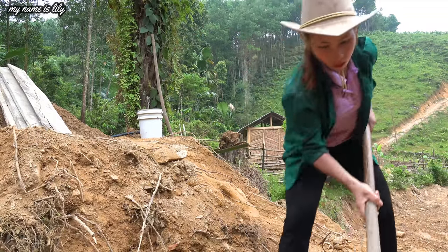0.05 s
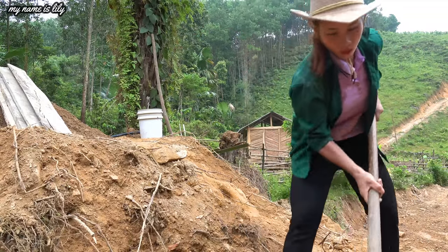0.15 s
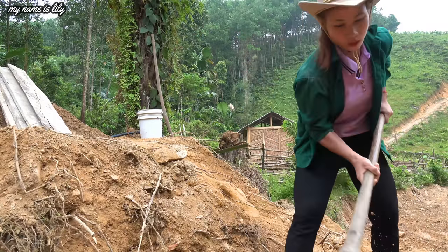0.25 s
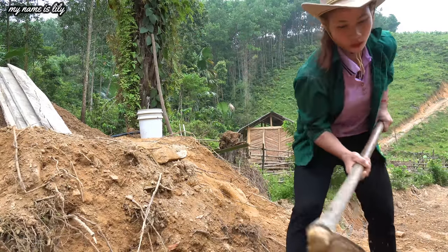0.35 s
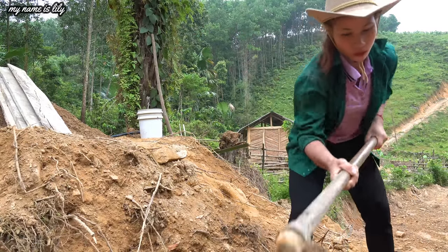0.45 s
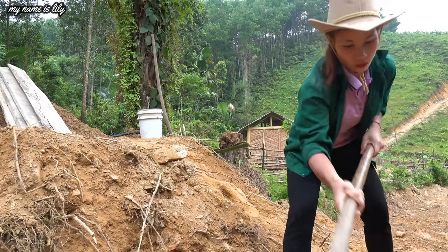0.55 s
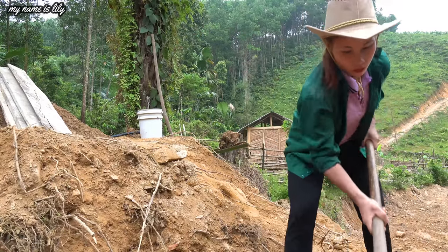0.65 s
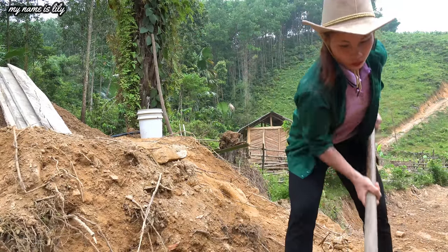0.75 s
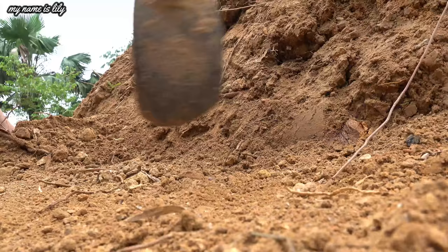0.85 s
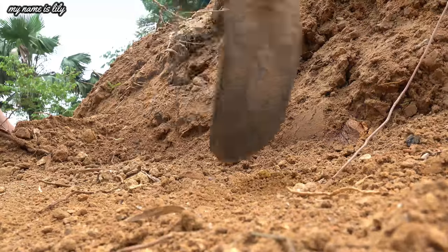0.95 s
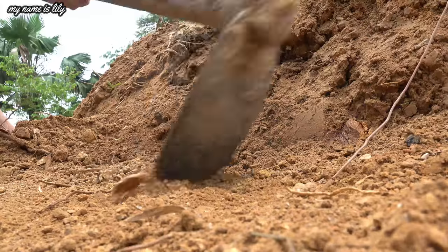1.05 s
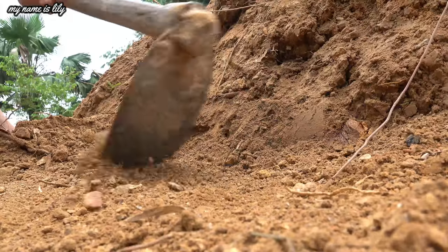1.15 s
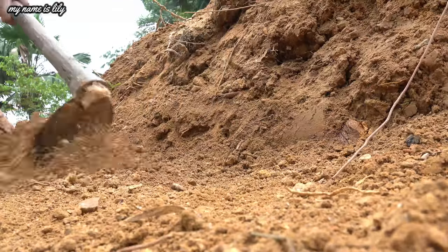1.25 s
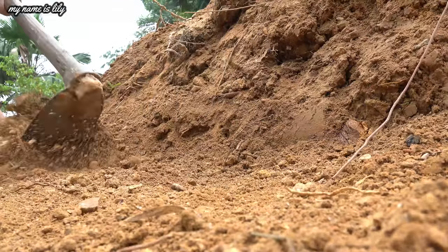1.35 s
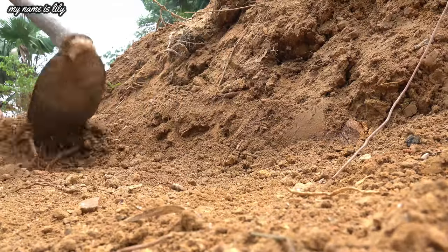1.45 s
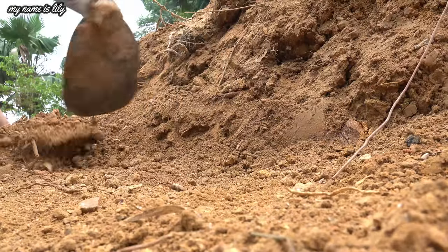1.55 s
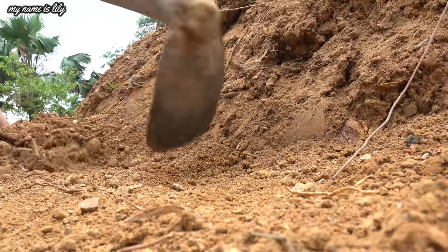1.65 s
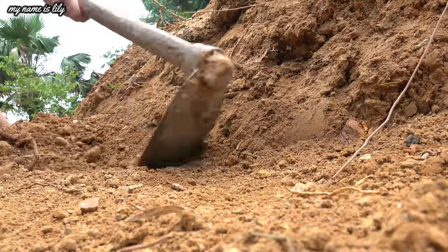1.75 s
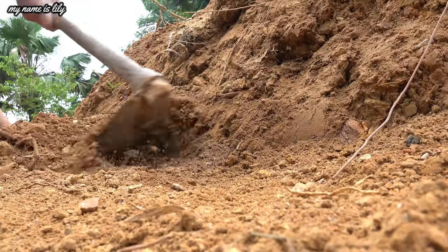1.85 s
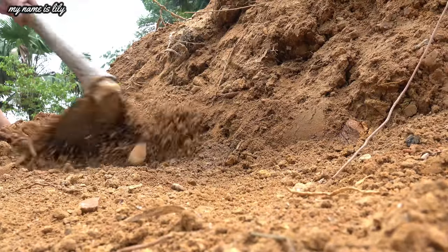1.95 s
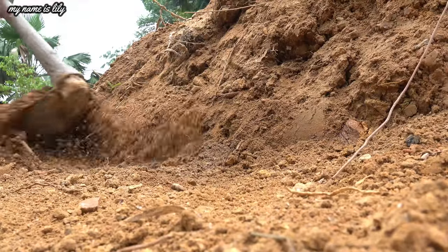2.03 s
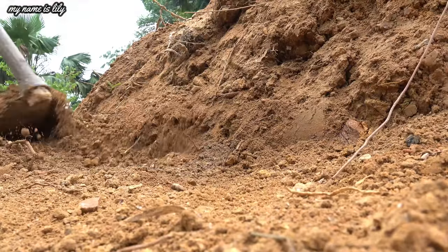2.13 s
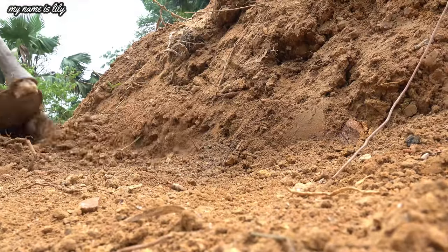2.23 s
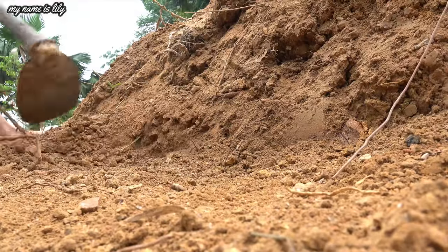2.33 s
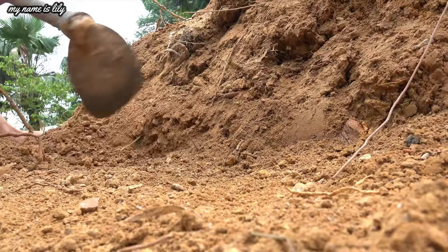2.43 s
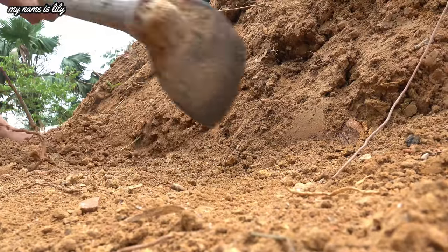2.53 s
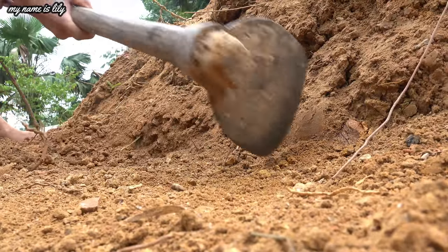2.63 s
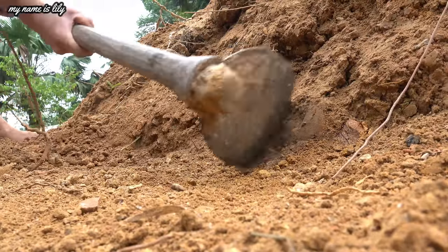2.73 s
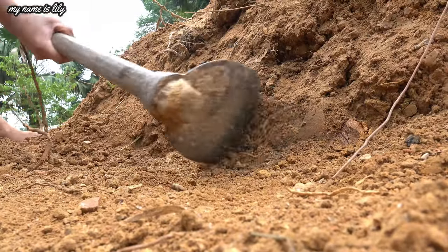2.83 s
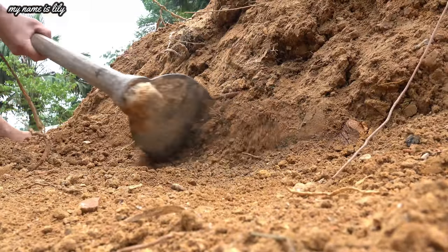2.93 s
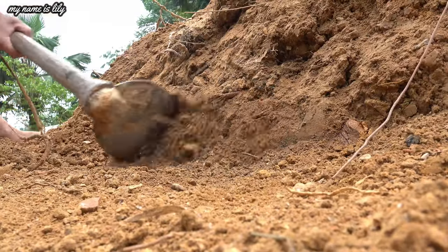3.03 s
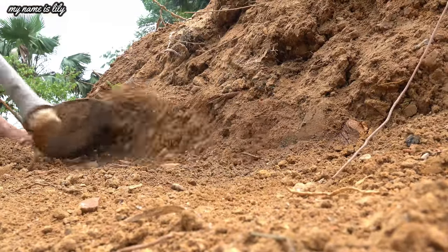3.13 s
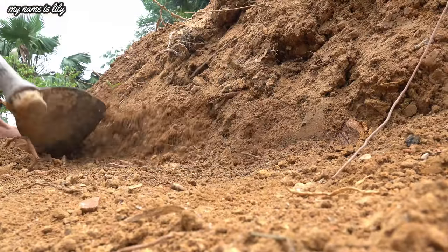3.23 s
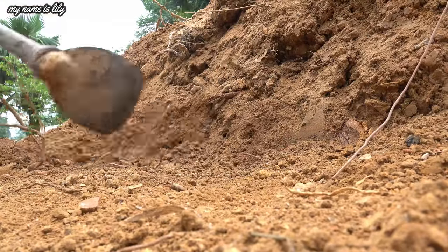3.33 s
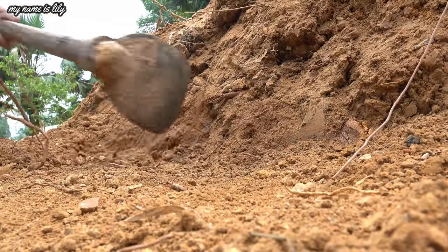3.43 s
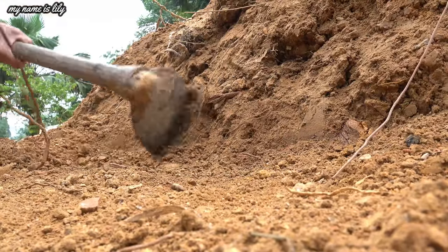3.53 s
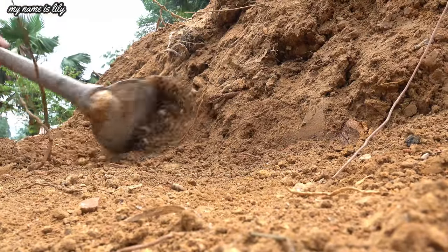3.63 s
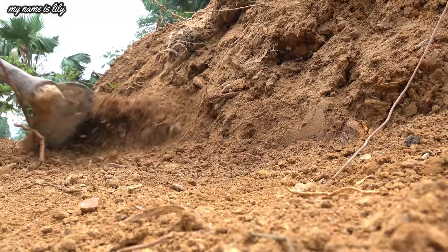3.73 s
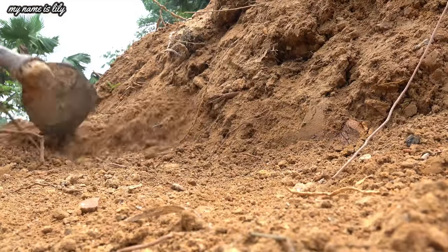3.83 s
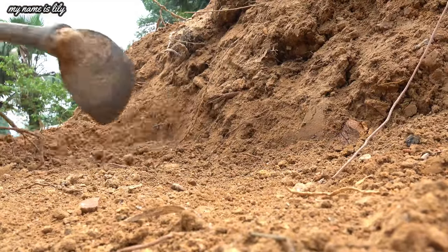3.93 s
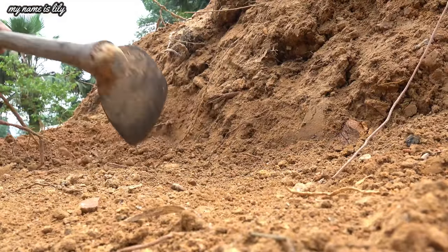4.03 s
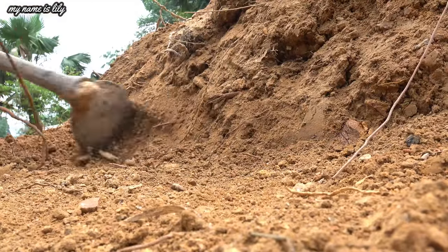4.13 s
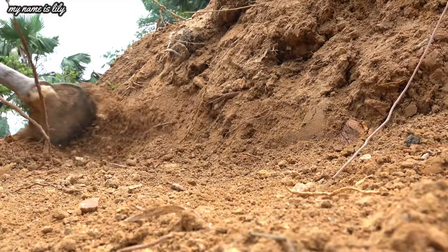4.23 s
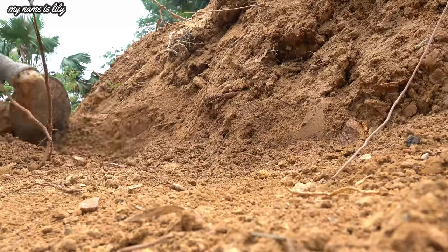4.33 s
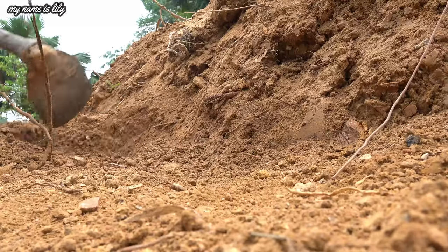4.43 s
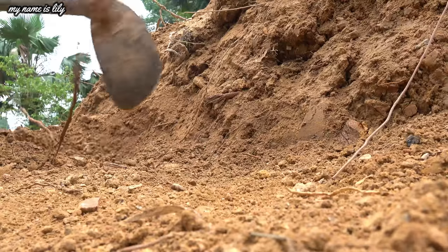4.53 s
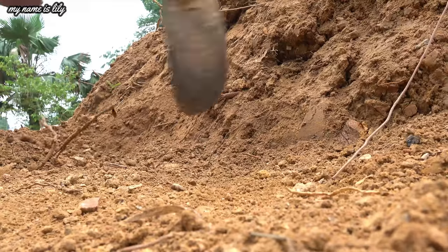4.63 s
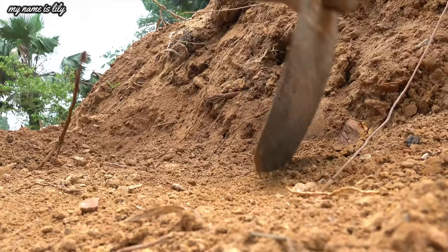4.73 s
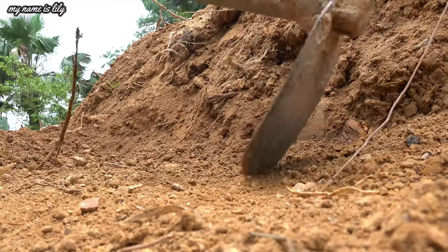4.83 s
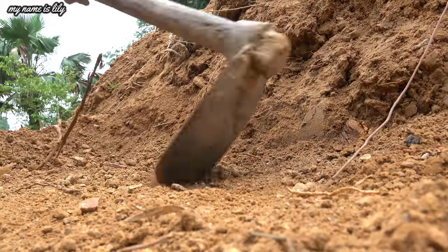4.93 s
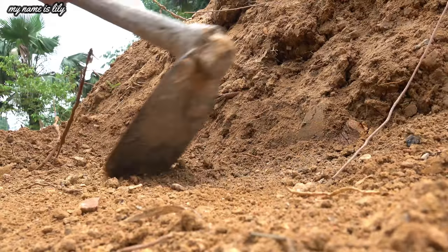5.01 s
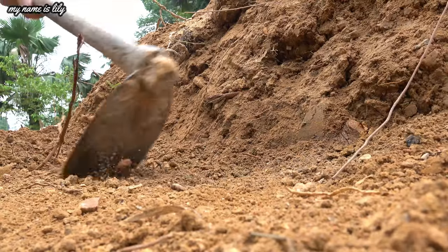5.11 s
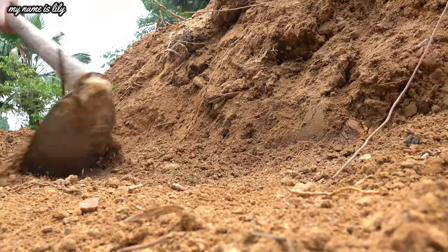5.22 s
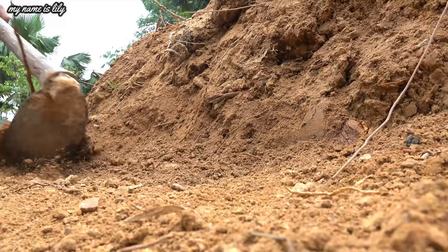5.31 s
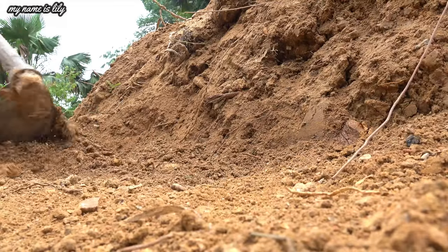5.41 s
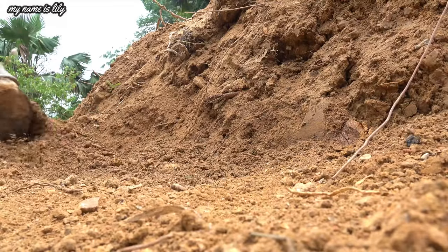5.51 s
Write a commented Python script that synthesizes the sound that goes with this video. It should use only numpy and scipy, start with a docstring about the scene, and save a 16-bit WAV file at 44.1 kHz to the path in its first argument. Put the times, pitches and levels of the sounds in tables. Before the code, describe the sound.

Outdoors, close to the ground: a sharp hoe chop opens, then short and long scraping pulls follow at irregular gaps. The blade rasps and rings brightly against pebbles, while packed earth thumps low and the wooden handle knocks. Each pull slides leftwards and fades; the last is long and strong. Light hiss lies beneath, with very little echo.

```python
"""A steady outdoor hiss is present from the start; after some 0.9 s it drops, and it swells again at the end.
From the first moment a steel hoe on a wooden handle chops stony soil: nine strokes on an open hillside.
In each, filtered bursts of cracking grains strike blade modes, over sliding soil made of shaped grain noise.
Decaying sines ring where steel hits stone squarely; resonant noise makes the ground thud and the handle knock.
As each pull goes on it moves from right to left and sags; then the soil stops and a short trickle follows."""
import sys
import numpy as np
from scipy.fft import rfft, irfft, next_fast_len
from scipy.io import wavfile
from scipy.ndimage import uniform_filter1d

SR = 44100
rng = np.random.default_rng(int(sys.argv[2]) if len(sys.argv) > 2 else 0)


def wav_out(sig):
    """Save sig, one row per channel (or a flat mono array), as 16-bit PCM at SR to the path in sys.argv[1]."""
    wavfile.write(sys.argv[1], SR, np.round(np.clip(np.atleast_2d(sig).T, -1, 1) * 32767).astype(np.int16))


N = 245624
BLOW_SIZE = 16384   # samples computed for one contact
FULL_SIZE = next_fast_len(N + BLOW_SIZE)
TIME, BLOW_TIME = np.arange(N) / SR, np.arange(BLOW_SIZE) / SR
HZ, BLOW_HZ = np.fft.rfftfreq(FULL_SIZE, 1 / SR), np.fft.rfftfreq(BLOW_SIZE, 1 / SR)
LEFT_RIGHT = np.array([[1], [-1]])

# the blade bites hard on grit or a stone:
# (time [s], contact time scale [s], level [dB], weight as low-mid colour [dB], loudest pitch [Hz])
GRIT_BITES = [(0.017, 0.0089, -15.5, 0.5, 3570), (0.021, 0.021, -15.5, 2.5, 3660),
              (0.046, 0.018, -18, 3, 4300), (0.0734, 0.027, -17.3, 5.5, 3930), (0.102, 0.017, -21, 7, 2380),
              (0.1227, 0.038, -28.5, 3, 4240), (0.163, 0.025, -28.5, 7, 1790),
              (0.688, 0.0085, -18, -6, 5900), (0.699, 0.034, -19, 4.5, 4230),
              (0.7505, 0.01, -21.5, 10, 2040), (1.055, 0.029, -20.5, -1, 8120), (1.108, 0.02, -29, 7, 8100),
              (1.132, .034, -20, -0.5, 4300), (1.1589, 0.022, -17, 6, 4400), (1.219, 0.041, -24, -6, 4900),
              (1.29, .031, -18, -3, 4300), (1.326, 0.0042, -15.5, 1, 4340), (1.334, 0.0017, -10, -11, 4460),
              (1.381, .025, -32, -2.5, 4650), (1.477, 0.027, -42, 1, 4460), (1.769, .006, -32, 10, 3640),
              (1.7772, 0.045, -21, -2, 7600), (1.851, 0.028, -20, -4, 7550), (1.879, 0.05, -21, -2, 8000),
              (1.9162, 0.01, -18.5, 5.5, 4420), (1.9417, 0.0064, -16.5, -6, 4440),
              (1.979, 0.0082, -22, -4, 5530), (2.011, 0.0051, -23.5, 2, 5840),
              (2.055, 0.011, -17.5, 2.5, 8060), (2.092, .012, -24.5, -34, 5700),
              (2.147, 0.021, -30.5, 1.5, 824), (2.2586, 0.02, -31, -10, 4300),
              (2.7192, 0.025, -19.5, 0.5, 7460), (2.754, 0.0085, -24.5, -0.5, 5000),
              (2.828, .004, -16.5, -3, 6700), (2.835, .033, -18, 4, 4800), (2.891, 0.0048, -22.5, -8, 4800),
              (2.9205, 0.025, -20, 4.5, 8300), (2.977, 0.029, -21.5, 0, 4700),
              (3.0115, 0.009, -18, 12.5, 2160), (3.028, .016, -22.5, 13, 8300),
              (3.056, 0.022, -22.5, 1.5, 4870), (3.084, 0.017, -21.5, -1.5, 8600),
              (3.109, 0.03, -22, 6, 8120), (3.2095, 0.045, -33, -5, 4530), (3.303, 0.01, -30, 1.5, 4460),
              (3.575, 0.0056, -21.5, -10, 8100), (3.576, .045, -24, -4.5, 8000),
              (3.5866, .033, -23, -13, 5000), (3.6266, 0.0053, -18.3, -22, 5370),
              (3.642, 0.0075, -18.5, 4, 5240), (3.66, 0.019, -18, 8, 870), (3.7024, 0.013, -19.5, -4, 8250),
              (3.7528, 0.02, -21, 1, 8800), (3.797, 0.017, -34, 5, 4680), (3.8175, 0.011, -24.5, -3, 4530),
              (3.841, 0.007, -31.5, -17, 4400), (4.1343, 0.014, -23.5, -1.5, 4400),
              (4.1467, 0.038, -20.5, -2.5, 8630), (4.193, 0.0023, -25, 7, 5650),
              (4.22, .0044, -21, -8, 5630), (4.2486, 0.01, -18, 0, 4120), (4.316, 0.034, -30.5, 2.5, 4600),
              (4.5387, 0.017, -35, -20, 4360), (4.827, 0.017, -21, -0.5, 7150),
              (4.951, 0.012, -20, -19, 4450), (4.978, 0.03, -22, -7, 8150), (5.008, 0.017, -15.5, 6, 8100),
              (5.0923, 0.025, -19, 1.5, 4600), (5.127, .013, -18, -9, 4600),
              (5.152, 0.014, -18.5, -14, 4570), (5.1732, 0.022, -17.5, 4, 4550),
              (5.2115, .022, -17.5, 2.5, 4400), (5.249, 0.013, -15.5, 4, 4000),
              (5.3062, 0.034, -15.5, 3.5, 3900), (5.3537, 0.058, -25.5, 3.5, 4100),
              (5.389, 0.0066, -16.5, -4.5, 4080), (5.45, 0.046, -27, 3, 4110),
              (5.502, .008, -27.5, -13, 4100)]
# blade modes: (frequency [Hz], width [Hz], relative level dragged flat [dB], relative level held by the edge [dB])
BLADE_MODES = [(797, 36, 8.5, 5), (1205, 140, -23.5, 6.5), (1800, 11, -5, -34), (2230, 43, -17, 2),
               (2360, 52, 1, 1.5), (3006, 105, -33, 11.5), (3432, 89, -20, 13.5), (3572, 77, 8, -18),
               (3950, 61, -2, 2), (4400, 89, -2, 4), (4460, 41, -12, -16), (4875, 36, 4, -29),
               (5180, 27, -13, -6), (5545, 140, 2.5, -21), (5970, 31, 3, 0), (6750, 80, 2.5, -52),
               (7172, 25, 1, 2.5), (7450, 19, -1, -5), (8120, 40, 7, 1), (8270, 43, 8, -8),
               (8750, 130, -3.5, -38), (9500, 150, -9, 5.5)]
# colour of crushed grit: (frequency [Hz], relative level [dB])
CRUSHED_GRIT = [(100, -21.5), (350, -13.5), (750, -7), (1400, -5), (2200, -1), (2950, -10), (3600, -2),
                (4400, 3.5), (6200, 1), (8300, 0.5), (10000, -9.5), (12000, -14), (16000, -19)]
TREBLE_SAG_DB_PER_S = 4   # bites get duller as the blade slows during a pull
# a bite with a higher loudest pitch is brighter
BRIGHT_DB_PER_OCTAVE, USUAL_PITCH_HZ = 0.5, 5000


def bites(pitch_db=3, pitch_width_hz=300, scatter_db=4, ring_db=-1, slip_db=2.5):
    """Stick-slip excitation: slipping grit drives a resonance at the bite's loudest pitch and a new mode mix."""
    out = np.zeros(N)
    modes = resonances(BLADE_MODES, BLOW_HZ)
    flat_db, edge_db = np.array(BLADE_MODES).T[2:]
    grit = colour(CRUSHED_GRIT, BLOW_HZ)
    for s, length, db, low_db, pitch_hz in GRIT_BITES + pebbles():
        pulled, free_db, edge, treble_db = stroke_at(s)
        treble_db = treble_db - TREBLE_SAG_DB_PER_S * pulled
        treble_db = treble_db + BRIGHT_DB_PER_OCTAVE * np.log2(pitch_hz / USUAL_PITCH_HZ)
        held_db = flat_db + edge * (edge_db - flat_db)
        mode_db = held_db + scatter_db * rng.standard_normal(len(BLADE_MODES))
        steel = (from_db(ring_db + free_db + mode_db)[:, None] * modes).sum(0)
        loudest = from_db(pitch_db) * resonances([(pitch_hz, pitch_width_hz)], BLOW_HZ)[0]
        tilt = colour([(2000, low_db), (3700, 0), (5500, 0), (7800, treble_db)], BLOW_HZ)
        tone = causal(grit * tilt)
        texture = grains(BLOW_SIZE, per_s=3200, spread_db=3.0, dust_db=-5.5)
        slips = from_db(slip_db * drift(320, BLOW_TIME))
        add(out, s, blow(pressure(length), texture * slips, tone * (1 + loudest + steel), db))
    return out


# small pebbles catch at random during a pull; their level is counted from the fine grit
PEBBLES_PER_S, PEBBLE_S, PEBBLE_DB, PEBBLE_SPREAD_DB, PEBBLE_WEIGHT_DB = 20, 0.0033, 7, 3.5, -14.5
PEBBLE_LOW_HZ, PEBBLE_HIGH_HZ = 4300, 5900


def pebbles():
    """Random impacts: light, short bites scattered over each pull after its build-up, in columns of GRIT_BITES."""
    rows = []
    for s, build_up, length, fine_db, *_ in HOE_STROKES:
        place, level, pitch = rng.random((3, 24))
        times = build_up + (np.arange(len(place)) + place) / PEBBLES_PER_S
        spread_db = PEBBLE_SPREAD_DB * (2 * level - 1)
        levels = fine_db + PEBBLE_DB + spread_db - PULL_SAG_DB_PER_S * times
        pitches = PEBBLE_LOW_HZ + pitch * (PEBBLE_HIGH_HZ - PEBBLE_LOW_HZ)
        for t, db, hz in zip(times, levels, pitches):
            if t < length:
                rows.append((s + t, PEBBLE_S, db, PEBBLE_WEIGHT_DB, hz))
    return rows


# the steel hits a stone squarely and rings on:
# (time [s], relative level [dB], ring time as a factor on T60 [1], favoured partial [Hz])
STONE_CLINKS = [(1.119, -16, 0.96, 8100), (1.176, -20, 0.43, 5090), (1.22, -18.5, 0.44, 4455),
                (1.237, -15.5, 1.16, 5090), (1.273, -14, 1.8, 8372), (1.495, -32, 1.8, 4455),
                (1.944, -21, 0.49, 4455), (2.266, -33.5, 3.8, 3562), (2.797, -28.5, 3.9, 797),
                (2.923, -14.5, 0.81, 3562), (2.962, -18, 0.78, 3562), (3.014, -17, 0.43, 2230),
                (3.027, -16, 2.6, 4455), (3.167, -24, 4.4, 8372), (3.305, -26, 1.8, 4455),
                (3.576, -28, 0.45, 8100), (3.819, -27.5, 1.3, 4875), (4.141, -16.5, 1.04, 797),
                (4.346, -22, 0.8, 4455), (4.536, -34, 2.3, 3562), (4.818, -22.5, 1.1, 7172),
                (4.945, -17, 1.3, 9580), (5.155, -21, 0.67, 4455), (5.231, -19, 0.79, 4130),
                (5.265, -15.5, 0.49, 4130), (5.394, -19, 0.66, 4130)]
# partials of the ringing blade: (frequency [Hz], relative level [dB], T60 before the clink's factor [s])
RING_PARTIALS = [(797, -11, 0.055), (1913, -12, 0.16), (2230, -8.5, 0.036), (3562, -2, 0.063),
                 (4130, -1, 0.018), (4455, -2, 0.057), (4875, -1, 0.048), (5090, -4, 0.089),
                 (5900, -6.5, 0.024), (7172, -5.5, 0.031), (8100, 1, 0.051), (8372, 3.5, 0.024),
                 (9580, -7, 0.096)]
# colour of the crack and of the fine grit in a drag: (frequency [Hz], relative level [dB])
FINE_GRIT = [(1500, -36), (2900, -30), (3600, -1), (4400, 8.5), (6200, 2), (8300, 4.5), (10000, -6.5),
             (12000, -8.5), (16000, -18)]


def clinks(level_db=3.5, scatter_db=3.0, favour_db=9, crack_db=-4, crack_t60=0.016):
    """Free modal decay: a hard contact cracks, then partials die away; the place struck favours one of them."""
    out = np.zeros(N)
    hz, mode_db, t60 = np.array(RING_PARTIALS).T[:, :, None]
    grit = causal(colour(FINE_GRIT, BLOW_HZ))
    for s, db, hold, favoured_hz in STONE_CLINKS:
        distance = abs(hz - favoured_hz)
        favoured = distance == distance.min()
        strength_db = mode_db + favour_db * favoured + scatter_db * rng.standard_normal(hz.shape)
        strength = from_db(strength_db) * rng.choice([-1, 1], hz.shape)
        decay = from_db(-60 * BLOW_TIME / (t60 * hold))
        ring = (strength * decay * np.sin(2 * np.pi * hz * BLOW_TIME)).sum(0)
        burst = rng.standard_normal(BLOW_SIZE) * from_db(-60 * BLOW_TIME / crack_t60)
        crack = irfft(rfft(burst) * grit)
        clink = ring / abs(ring).max() + from_db(crack_db) * crack / abs(crack).max()
        add(out, s, from_db(db + level_db) * clink)
    return out


# colour of coarse crumbs: (frequency [Hz], relative level [dB])
COARSE_CRUMBS = [(60, -55), (160, 18), (300, 5), (480, 13.5), (800, 0.5), (1400, 5.5), (2200, 9),
                 (3000, 0.5), (5000, -26)]


def drag(lumpy_db=1.0, ring_db=-1):
    """Friction-driven resonance: loose soil slides unevenly over the blade and keeps its modes singing."""
    fine_db, coarse_db = sliding_soil()
    _, free_db, edge, _ = stroke_at(TIME)
    lumps = lumpy_db * drift(130)
    modes = resonances(BLADE_MODES, HZ)
    flat, edged = [(from_db(db + ring_db)[:, None] * modes).sum(0) for db in np.array(BLADE_MODES).T[2:]]
    out = 0
    for db, spectrum, per_s in [(fine_db, FINE_GRIT, 2500), (coarse_db, COARSE_CRUMBS, 900)]:
        rub = from_db(db + lumps) * grains(N, per_s, spread_db=5.0, dust_db=-5.5)
        tone = colour(spectrum, HZ)
        tone = tone / np.sqrt(np.mean(abs(tone * (1 + flat)) ** 2))
        steel = rub * from_db(free_db)
        out = out + shaped(rub, tone)
        out = out + shaped(steel * (1 - edge), tone * flat) + shaped(steel * edge, tone * edged)
    return out


# during a pull the blade slows and the sliding soil gets quieter
PULL_SAG_DB_PER_S = 13.5
# after a pull the sliding stops quickly and the thrown soil trickles down
RELEASE_DB_PER_S, TRICKLE_DB, TRICKLE_DB_PER_S = 332, -8, 104
# the blade enters the soil and is pulled back:
# (time [s], build-up [s], pull length [s], fine grit level [dB], coarse crumb level [dB],
#  relative blade ringing [dB], share held by the edge alone [0-1], treble colour [dB])
HOE_STROKES = [(0.012, 0.052, 0.059, -26, -29, -4, 0.99, -6),
               (0.69, .025, 0.075, -33, -34.5, 3, 0.66, -0.5),
               (1.031, 0.38, 0.33, -28, -34.5, 2.5, 0.51, 0), (1.775, 0.049, 0.36, -28, -40.5, 0, 0.23, -1),
               (2.715, 0.26, 0.45, -33.5, -36.5, 2.5, 0.03, 2),
               (3.565, 0.045, 0.15, -28, -36.5, -2.5, 0, 1.5),
               (4.133, .04, .15, -29, -37.5, -0.5, 0.02, 0.5), (4.808, 0.2, 0.192, -27, -37.5, 5, 0.83, 3),
               (5.046, 0.071, 0.48, -28.5, -40.5, 0, 0.9, 0.5)]


def sliding_soil():
    """Granular flow: levels [dB] of fine and coarse soil as each pull builds up, sags, stops and trickles."""
    gain = np.zeros((2, N))
    for s, build_up, length, fine_db, coarse_db, *_ in HOE_STROKES:
        pulled, after = np.clip(TIME - s, 0, length), np.maximum(TIME - s - length, 0)
        pull = np.minimum(pulled / build_up, 1) ** 2 * from_db(-PULL_SAG_DB_PER_S * pulled)
        stop = from_db(-RELEASE_DB_PER_S * after)
        trickle = from_db(TRICKLE_DB - TRICKLE_DB_PER_S * after)
        gain += from_db([[fine_db], [coarse_db]]) * pull * np.maximum(stop, trickle)
    return 20 * np.log10(gain + 1e-6)


def stroke_at(t, lead_s=.03):
    """Boundary conditions of the blade at t: (time pulled [s], ringing [dB], edge share [0-1], treble [dB])."""
    rows = np.array(HOE_STROKES)
    # a stroke takes over slightly before its own start
    current = np.maximum(np.searchsorted(rows[:, 0], t + lead_s) - 1, 0)
    s, _, length, _, _, free_db, edge, treble_db = rows[current].T
    return np.clip(t - s, 0, length), free_db, edge, treble_db


# the whole weight of the hoe lands:
# (time [s], contact time scale [s], ground thud level [dB], relative handle knock [dB], knock pitch [Hz])
WEIGHT_THUDS = [(0.025, 0.019, -29.5, -47, 490), (0.105, 0.0095, -39, -25.5, 463),
                (0.715, 0.05, -34, -33.5, 710), (1.062, 0.043, -35.5, -51, 850),
                (1.157, 0.043, -31.5, -34, 310), (1.216, 0.0069, -32.5, -39, 800),
                (1.306, 0.011, -34, -29, 444), (1.779, 0.055, -37, -38, 820),
                (1.848, 0.059, -45, -31.5, 700), (1.909, 0.0091, -30.5, -18, 477),
                (1.955, 0.0095, -48, -30.5, 473), (2.048, 0.02, -42, -32.5, 870),
                (2.148, .013, -58, -32.5, 844), (2.848, 0.031, -31.5, -25.5, 780),
                (3.031, 0.025, -37, -29.5, 493), (3.179, 0.033, -41, -44, 472),
                (3.65, .037, -39, -24.5, 466), (3.758, 0.016, -36, -38, 470), (4.14, 0.033, -39, -26, 736),
                (4.831, 0.021, -31.5, -38, 613), (5.007, 0.036, -36.5, -32.5, 810),
                (5.214, 0.015, -31, -27.5, 864)]
# wooden handle modes: (frequency [Hz], width [Hz], relative level [dB])
HANDLE_MODES = [(360, 46, -17), (438, 40, 2.5), (640, 990, -2.5), (797, 16, -23)]
# colour of the packed earth: (frequency [Hz], relative level [dB])
PACKED_EARTH = [(20, -49), (60, -27), (110, -9.5), (160, -4.5), (210, -6), (280, -10), (600, -31),
                (2000, -59)]
THUD_HZ, THUD_PITCH_SPREAD = 162.3, 0.082   # the ground's note; its share of change from spot to spot


def thuds(handle_db=-1, knock_gain=3.2, thud_width_hz=34, knock_width_hz=45, crumble_db=-2, shock_t60=0.0058):
    """Damped resonance: packed earth thumps dully; the shock runs up the handle, its pitch set by the hold."""
    out = np.zeros(N)
    soil = causal(colour(PACKED_EARTH, BLOW_HZ))
    handle = (from_db(np.array(HANDLE_MODES)[:, 2:]) * resonances(HANDLE_MODES, BLOW_HZ)).sum(0)
    soft = causal(colour([(150, -7), (330, 4.0), (850, 2.5), (2000, -23.0)], BLOW_HZ))
    shock = rms_one(from_db(-60 * BLOW_TIME / shock_t60))
    for s, length, thud_db, wood_db, knock_hz in WEIGHT_THUDS + jolts():
        thud_hz = THUD_HZ * np.exp(THUD_PITCH_SPREAD * rng.standard_normal())
        earth, knock = resonances([(thud_hz, thud_width_hz), (knock_hz, knock_width_hz)], BLOW_HZ)
        force = pressure(length)
        crumble = from_db(crumble_db) * rng.standard_normal((2, BLOW_SIZE))
        add(out, s, blow(force, crumble[0] + shock / 20, soil * (0.4 + earth), thud_db))
        wood = soft * (handle + knock_gain * knock)
        add(out, s, blow(force, crumble[1], wood, wood_db + handle_db))
    return out


# every bite also jolts ground and handle, a moment later and for longer, by its level plus its weight
JOLT_LAG_S, JOLT_STRETCH, JOLT_GROUND_DB, JOLT_HANDLE_DB, JOLT_KNOCK_HZ = 0.003995, 1.01, -29, -24.5, 810


def jolts():
    """Transmitted impulse: the light thud and knock after each listed bite, in columns of WEIGHT_THUDS."""
    rows = []
    for s, length, db, weight_db, _ in GRIT_BITES:
        jolt_db = db + weight_db
        rows.append((s + JOLT_LAG_S, length * JOLT_STRETCH,
                     jolt_db + JOLT_GROUND_DB, jolt_db + JOLT_HANDLE_DB, JOLT_KNOCK_HZ))
    return rows


# side against mid for the scattered sound of the hoe: (frequency [Hz], level [dB])
HOE_SPREAD = [(60, -4), (200, -17), (800, -12), (1800, -22), (2800, -26), (4000, -28), (6000, -18),
              (8000, -13), (11000, -1.5), (12500, -14), (15000, -19)]
# phase by which the left microphone port lags in the treble: (frequency [Hz], phase [rad])
LEFT_PORT_LAG = [(4500, 0), (6200, 0.55), (7500, 0.41), (8500, .22), (9900, 0.52), (11000, 0.058)]
# each pull draws the blade from the right towards the left (left-right dB)
ENTRY_PAN_DB, PULL_PAN_DB_PER_S = -1, 10.5


def hillside(x, echo_db=-22, echo_t60=0.17):
    """Scattering and reverberation: the near bank scatters phase between the ports; the slope adds a faint tail."""
    scatter = rng.standard_normal(BLOW_SIZE) * from_db(-60 * BLOW_TIME / 0.028)
    spread = np.tanh(2 * rms_one(rfft(scatter, FULL_SIZE).real))
    side = 1j * (spread * colour(HOE_SPREAD, HZ) - np.interp(HZ, *np.transpose(LEFT_PORT_LAG)) / 2)
    pan_db = uniform_filter1d(ENTRY_PAN_DB + PULL_PAN_DB_PER_S * stroke_at(TIME)[0], size=1024)
    direct = shaped(x, 1 + side * LEFT_RIGHT) * from_db(pan_db * LEFT_RIGHT / 2)
    decay = from_db(-60 * BLOW_TIME / echo_t60) * (1 - np.exp(-BLOW_TIME / 0.0084))
    tail = rms_one(rng.standard_normal(BLOW_SIZE) * decay)
    echo = rfft(tail, FULL_SIZE) / np.sqrt(BLOW_SIZE) * colour([(300, 5), (4000, -1), (12000, -6)], HZ)
    width = 1 + 1j * spread * colour(AIR_SPREAD, HZ) * LEFT_RIGHT
    return direct + from_db(echo_db) * shaped(x, echo * width)


# colour of the outdoor hiss: (frequency [Hz], relative level [dB])
AIR_COLOUR = [(15, -51), (25, -21), (92, -5), (285, -3.5), (344, -2.5), (416, -6), (463, -3.5), (775, -7),
              (840, -9), (1070, -6), (2840, -9), (4610, -4.5), (5570, -12), (11600, -25), (16000, -35)]
# side against mid for the hiss and the slope's tail: (frequency [Hz], level [dB])
AIR_SPREAD = [(60, -15), (400, -12.5), (900, -11), (2000, -24), (4000, -30), (5500, -11.5), (7500, 3),
              (10000, 0), (12500, -3), (15500, -18)]
# outdoor hiss: (time [s], level [dB])
HISS_LEVEL = [(0, -44), (.3, -45), (.91, -44.5), (.93, -50.5), (2.5, -49), (4.05, -51.5), (4.75, -48),
              (5.57, -41)]


def air(waver_db=1.93):
    """Diffuse field: filtered noise wavers a little, its mid and side independent, and is wide in the treble."""
    mid, side = rng.standard_normal((2, N))
    tone = rms_one(colour(AIR_COLOUR, HZ))
    hiss = shaped(mid, tone) + shaped(side, tone * colour(AIR_SPREAD, HZ)) * LEFT_RIGHT
    return hiss * from_db(in_time(HISS_LEVEL)[0] + waver_db * drift(25))


def grains(size, per_s, spread_db, dust_db):
    """Shot noise: sand grains crack at random with uneven force, over a smooth rush of dust."""
    born = rng.random(size) < per_s / SR
    force, sign = rng.exponential(1, size), rng.choice([-1, 1], size)
    cracks = born * sign * from_db(spread_db * np.minimum(force, 4))
    return rms_one(rms_one(cracks) + from_db(dust_db) * rng.standard_normal(size))


def pressure(length):
    """Contact force: it builds on an obstacle and lets go; short contacts are the sharpest."""
    v = np.minimum(BLOW_TIME / length, 4)
    return (1 - np.exp(-8 * v)) * np.exp(-v ** 3)


def blow(force, texture, response, db):
    """Source and filter: a textured force sounds through a response, its power set by level and force."""
    sound = irfft(rfft(force * texture) * response)
    return from_db(db) * rms_one(sound) * np.sqrt(np.mean(force ** 2))


def resonances(modes, hz):
    """Simple damped resonators: one row per mode, with gain 1 at its peak."""
    centre, width = np.array(modes).T[:2, :, None]
    return 1j * hz * width / (centre ** 2 - hz ** 2 + 1j * hz * width)


def causal(gain):
    """Causality: the minimum-phase response of a gain curve, in which nothing sounds before its cause."""
    cepstrum = irfft(np.log(gain + 1e-6))
    fold = 1 + np.sign(len(cepstrum) / 2 - np.arange(len(cepstrum)))
    fold[0] = 1
    return np.exp(rfft(cepstrum * fold))


def colour(points, hz):
    """Spectral envelope: gain of a (frequency [Hz], level [dB]) curve, straight on a log axis."""
    at, db = np.transpose(points)
    return from_db(np.interp(np.log(hz + 1), np.log(at), db))


def shaped(x, gain):
    """Linear filtering: pass a whole signal through a frequency response."""
    return irfft(rfft(x, FULL_SIZE) * gain, FULL_SIZE)[..., :N]


def drift(rate, t=TIME):
    """Random modulation: smooth chance with spread 1, changing rate times a second."""
    points = rng.standard_normal(len(t) // 16)
    return rms_one(np.interp(t * rate, np.arange(len(points)), points))


def in_time(rows, t=TIME):
    """Linear interpolation: columns of a curve at times t."""
    s, *columns = np.transpose(rows)
    return [np.interp(t, s, c) for c in columns]


def from_db(db):
    """Logarithmic level: decibels to gain."""
    return 10 ** (np.asarray(db) / 20)


def rms_one(x):
    """Normalisation: scale to unit power."""
    return x / np.sqrt(np.mean(x ** 2) + 1e-20)


def add(out, s, sound):
    """Superposition: mix a sound in at time s."""
    start = int(np.clip(s * SR, 0, N - 1))
    out[start:start + len(sound)] += sound[:N - start]


def scene():
    """Superposition of the hoe's sources, heard over the hillside and the diffuse hiss of the open air."""
    hoe = clinks() + drag() + thuds() + bites()
    return air() + hillside(hoe)


def record(dry, top=.5, rumble_hz=32, cutoff_hz=16000):
    """Saturation and band limits: peaks are rounded off, deep rumble is reduced and the top is cut."""
    rounded = dry / (1 + (dry / top) ** 4) ** (1 / 4)
    no_rumble = HZ ** 2 / np.hypot(HZ ** 2, rumble_hz ** 2)
    top_cut = 1 / np.sqrt(1 + (HZ / cutoff_hz) ** 200)
    return shaped(rounded, no_rumble * top_cut)


dry = scene()
out = record(dry)
wav_out(out)
```